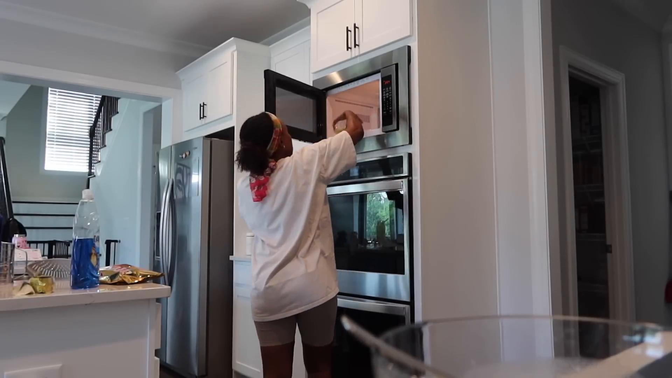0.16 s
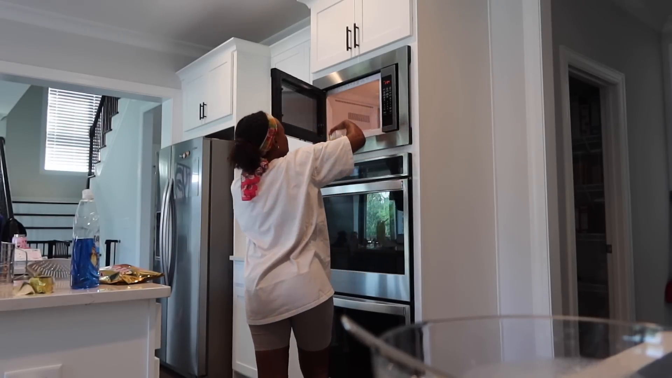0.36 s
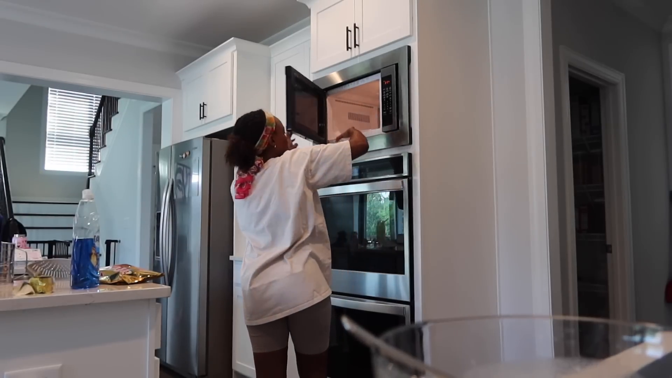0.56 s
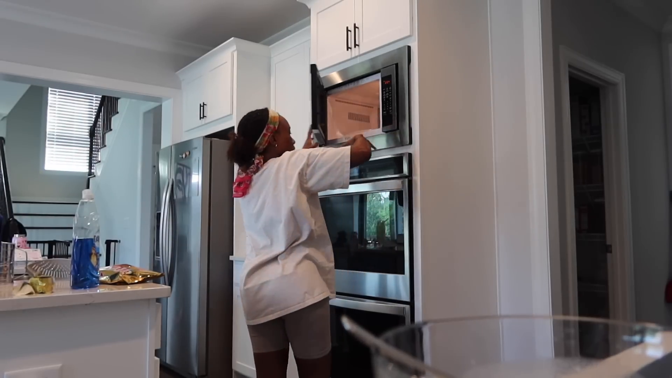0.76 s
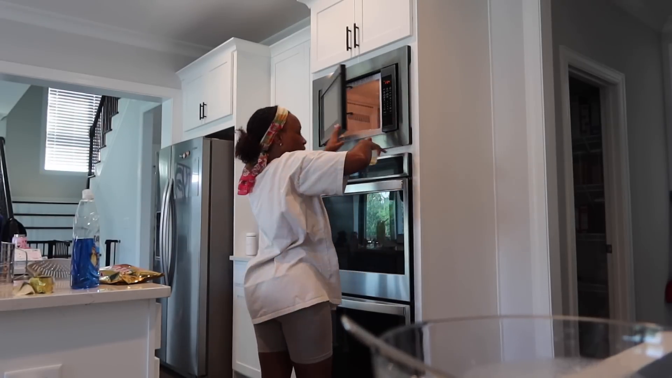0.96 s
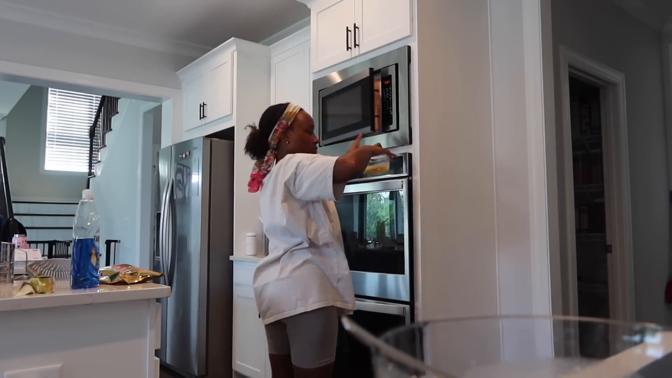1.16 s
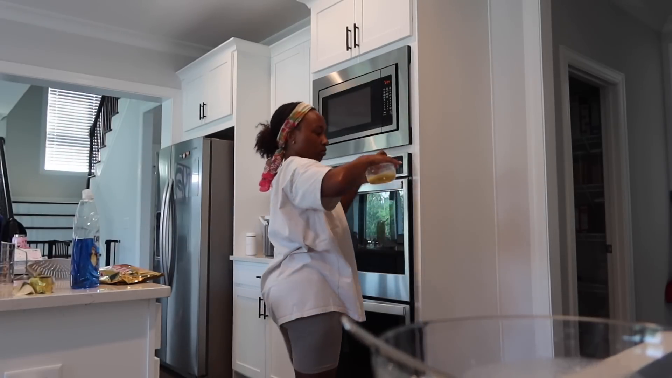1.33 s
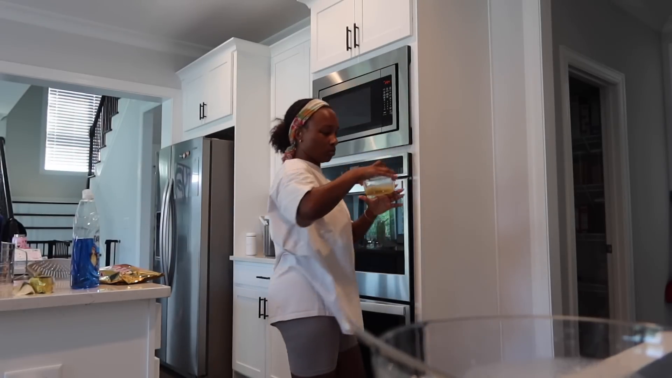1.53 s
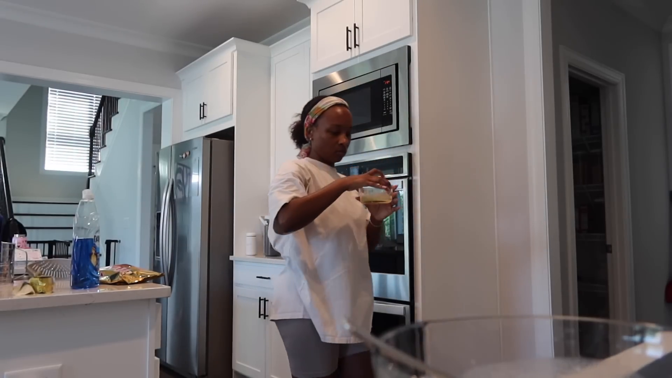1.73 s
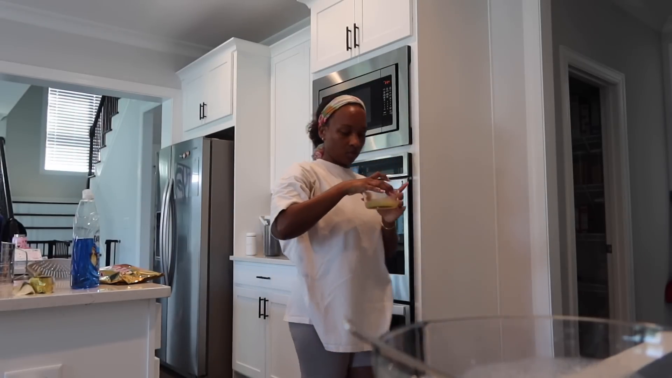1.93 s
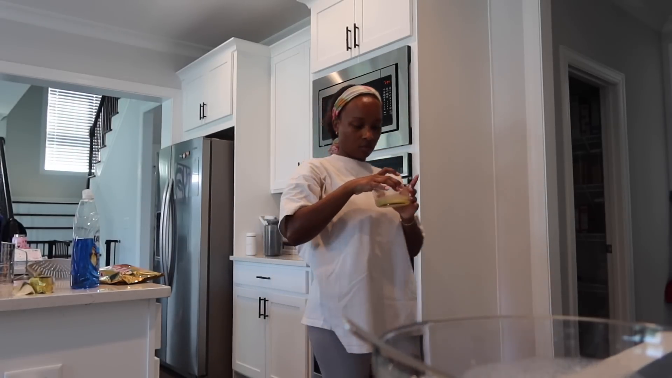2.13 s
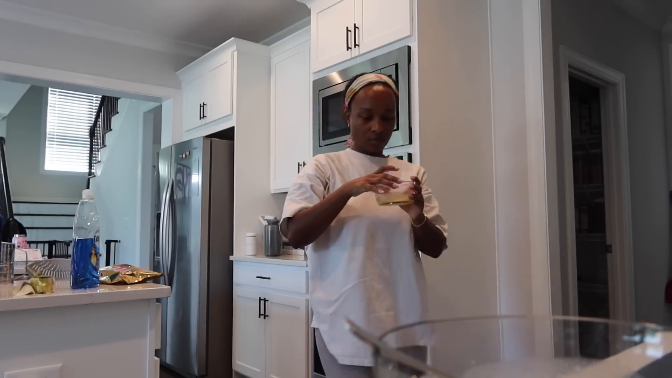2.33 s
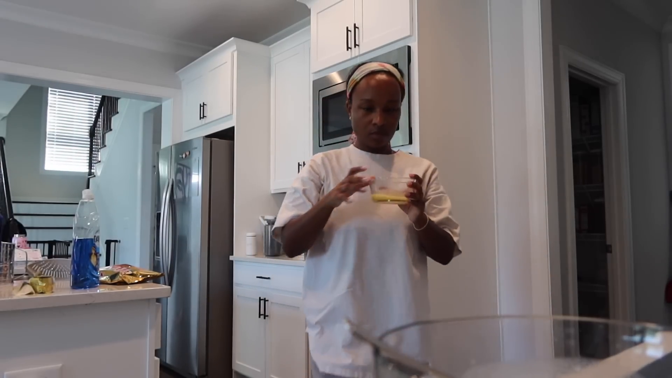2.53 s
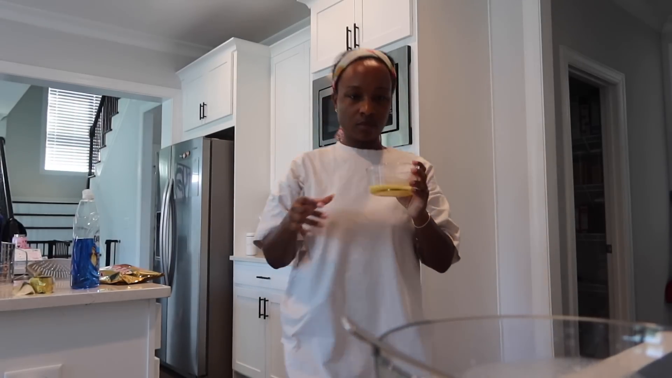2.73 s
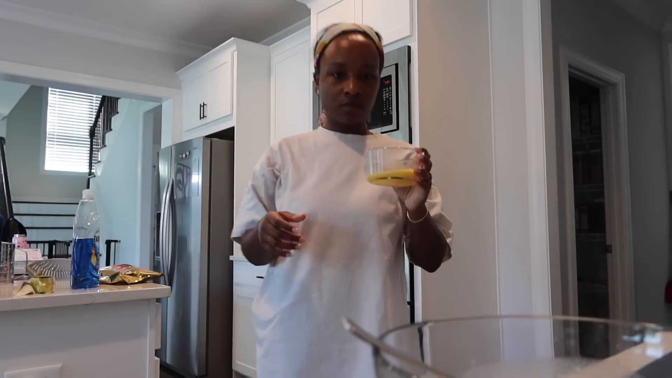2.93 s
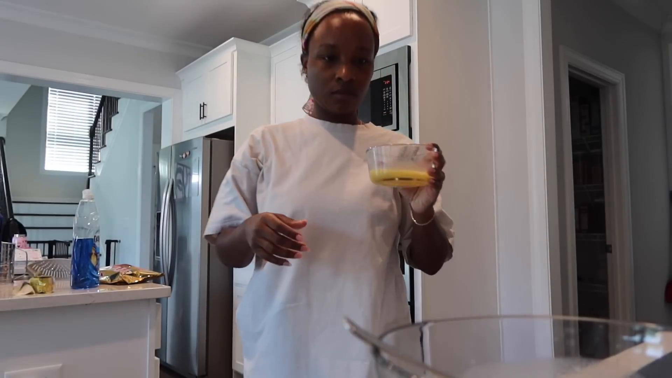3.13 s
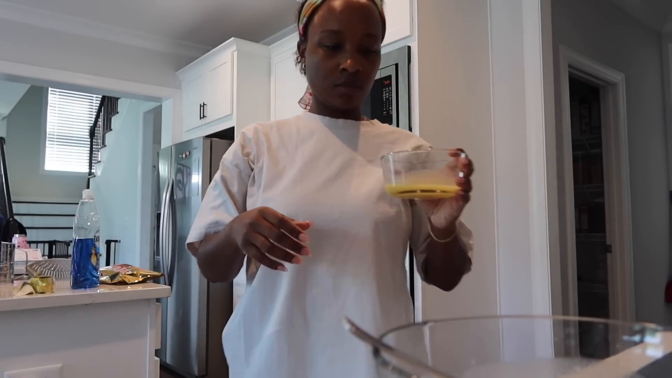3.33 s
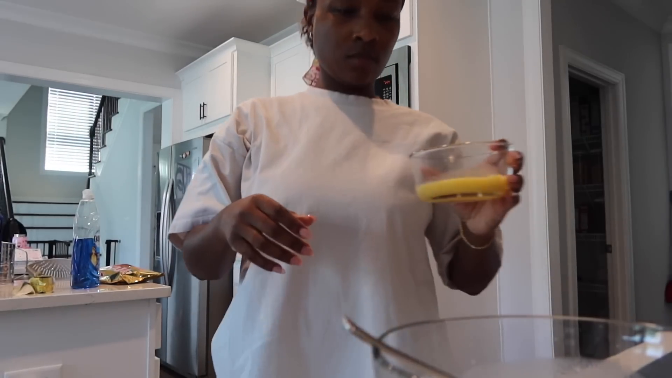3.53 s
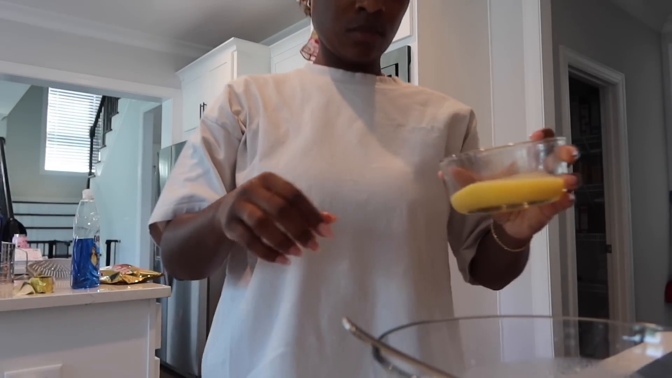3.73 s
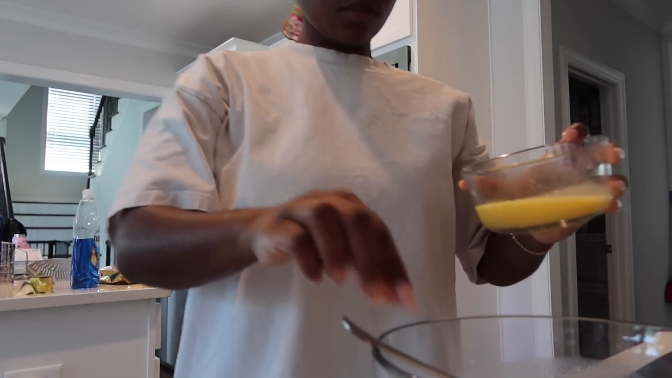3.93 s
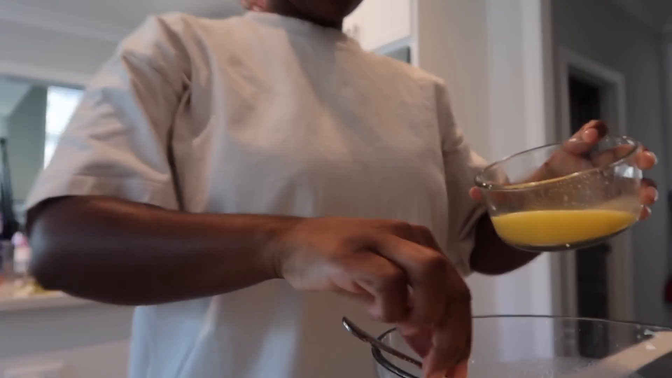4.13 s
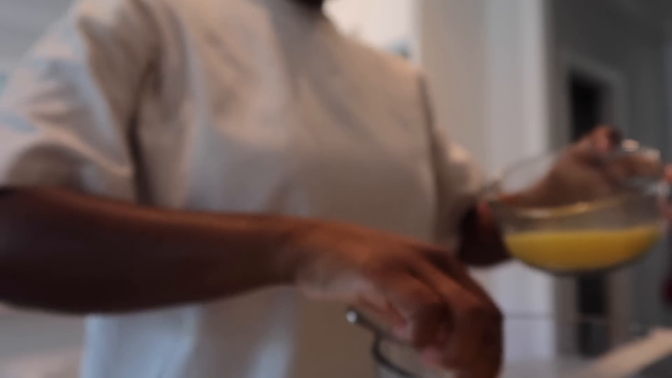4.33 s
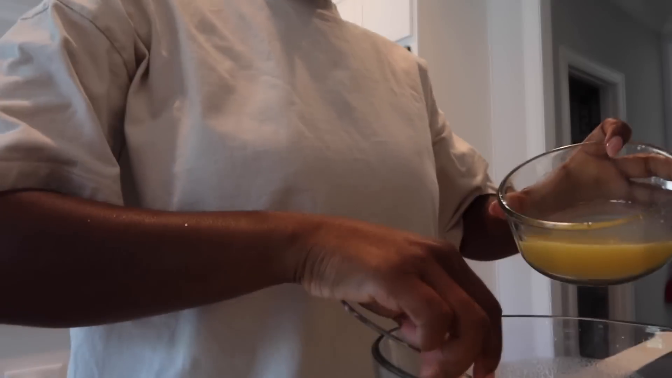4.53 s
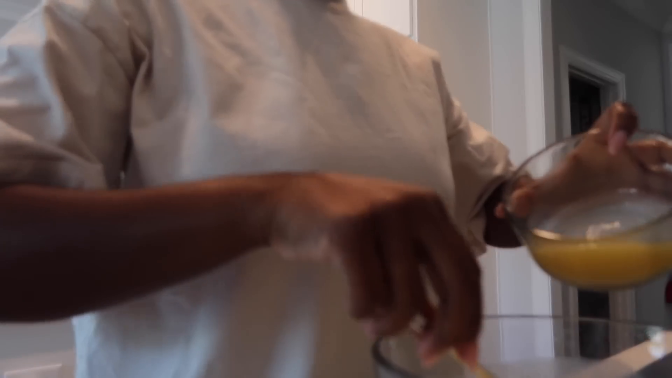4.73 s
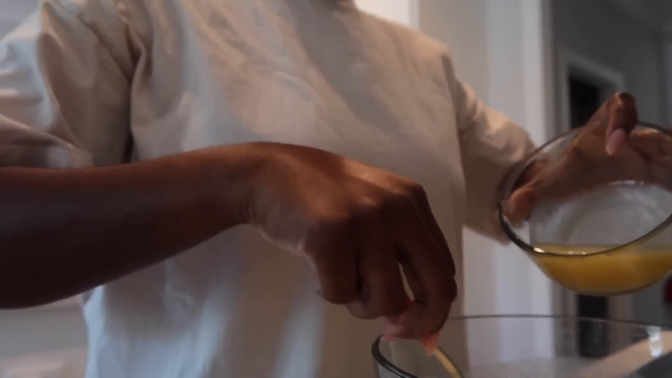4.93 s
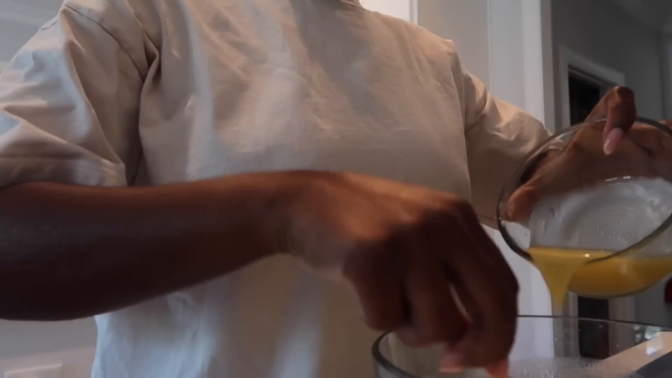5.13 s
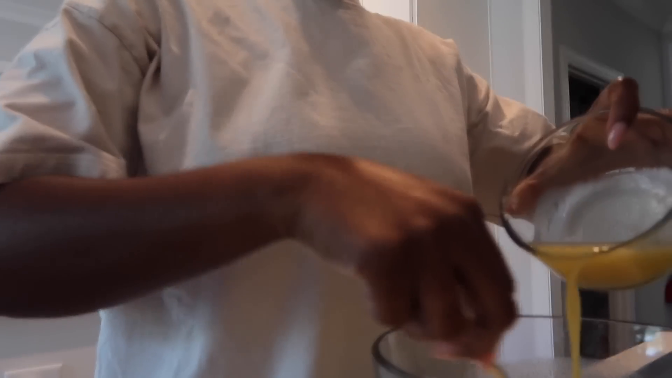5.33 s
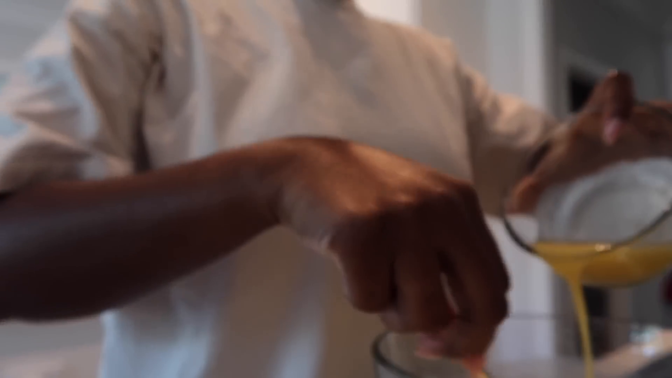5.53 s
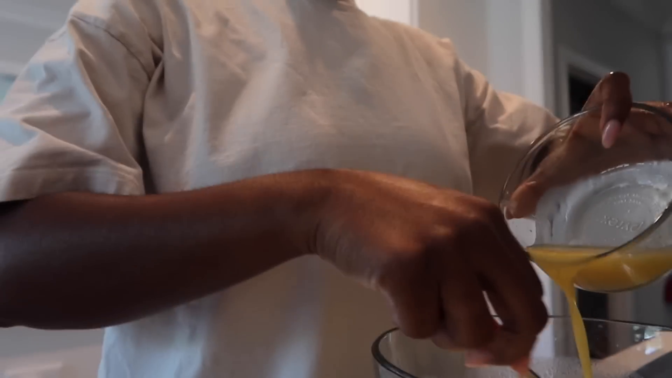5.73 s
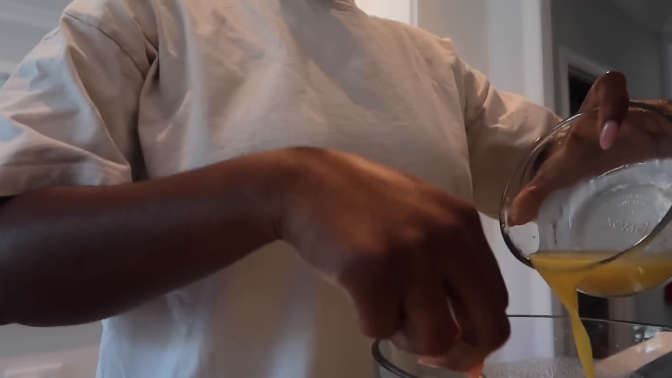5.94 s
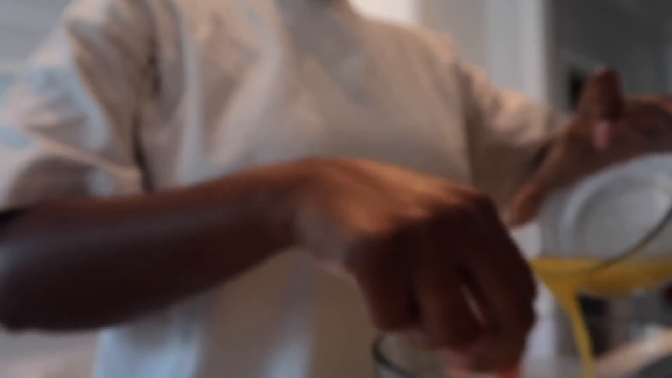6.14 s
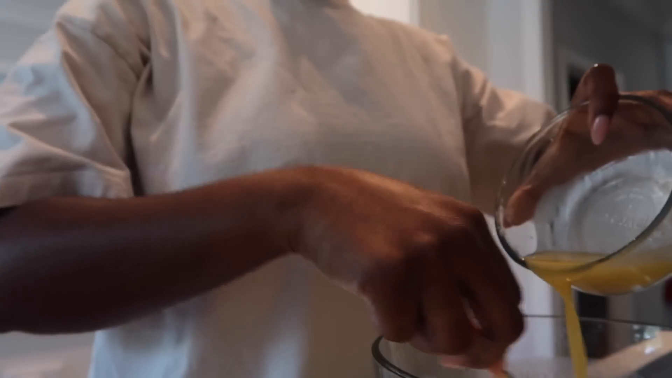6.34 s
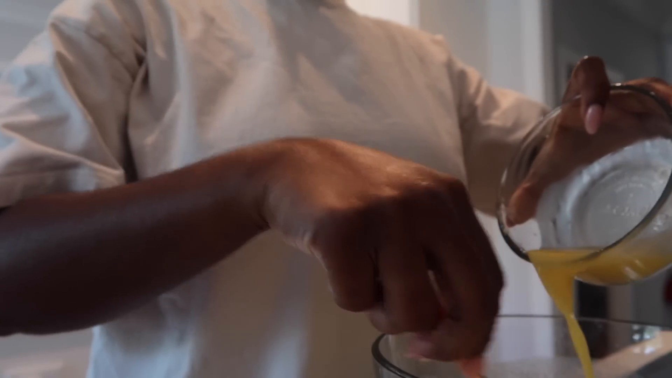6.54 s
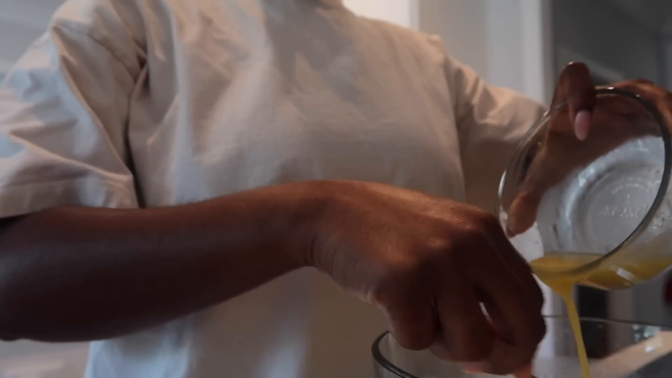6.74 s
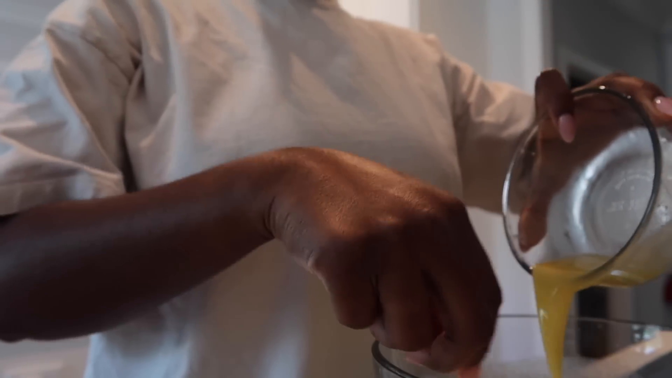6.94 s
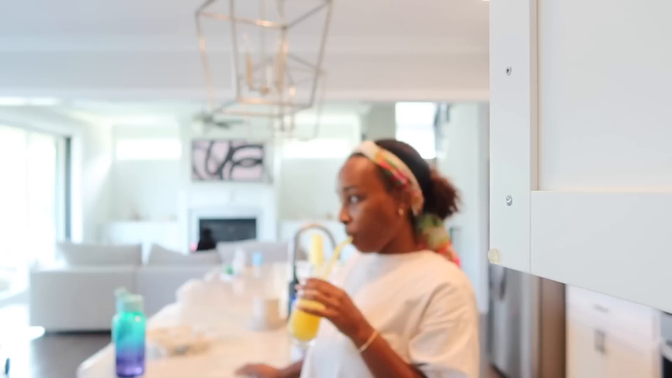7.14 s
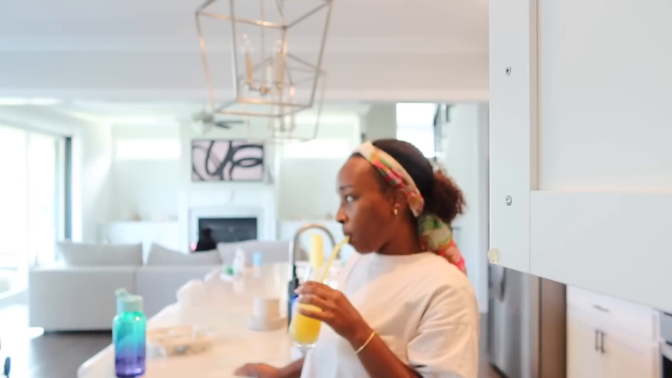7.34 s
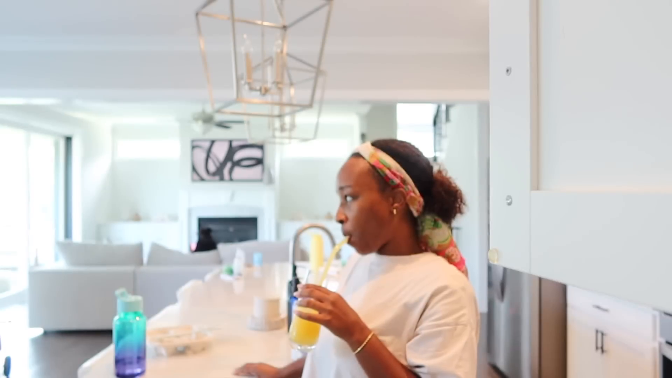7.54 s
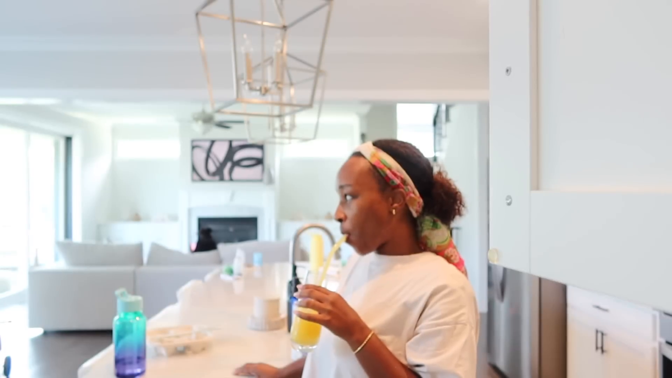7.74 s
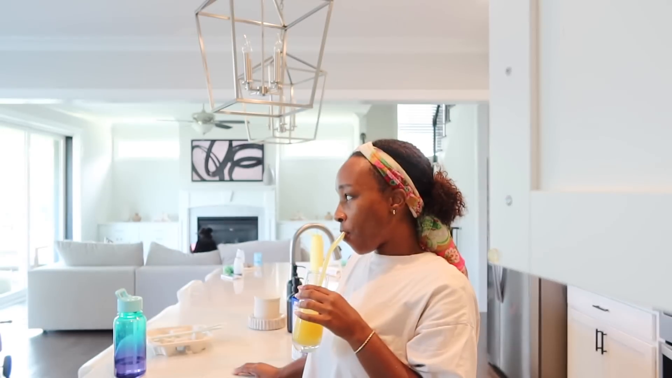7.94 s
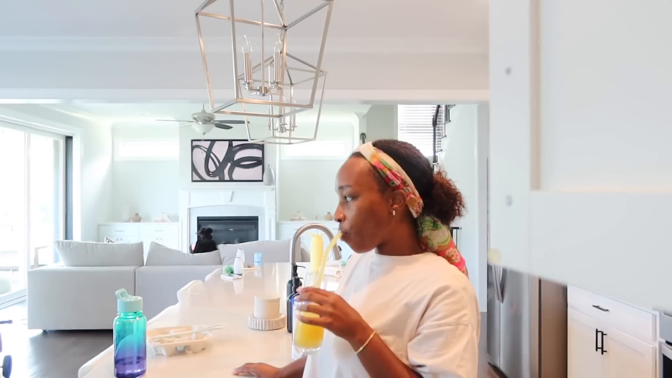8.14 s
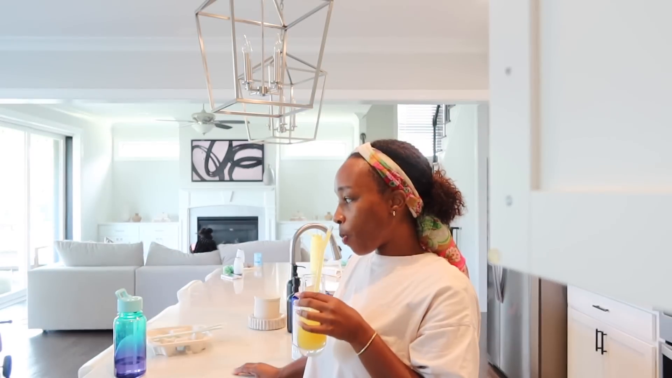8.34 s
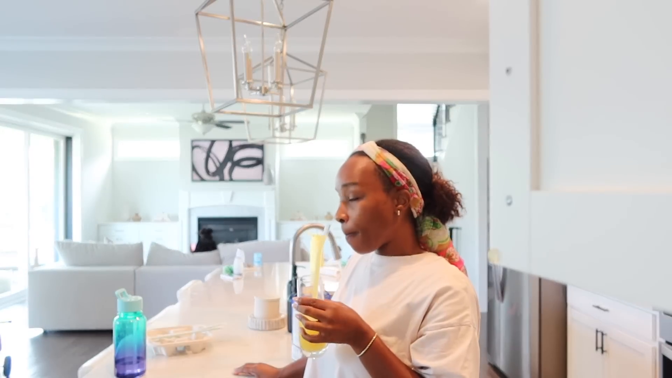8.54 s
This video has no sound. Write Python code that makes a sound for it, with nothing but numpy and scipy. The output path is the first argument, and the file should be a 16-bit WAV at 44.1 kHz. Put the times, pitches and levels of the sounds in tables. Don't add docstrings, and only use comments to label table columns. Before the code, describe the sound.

A quiet, fairly reverberant home kitchen with soft low appliance hum, the microphone on the worktop. Faint cloth brushes at 0.0 and 0.4 s. At 1.3 s a latch cracks, and at 1.36 s a door slams extremely loudly, near clipping, with a hollow boom and under a second of room echo. Cloth sweeps around 2.0-2.4 s; a dry floor snap and soft thud at 2.55 s, light steps at 2.7 and 3.4, another snap at 3.9. From 4.2 to 4.6 s a spoon chatters and knocks on a glass bowl, close and slightly right, with a brief glassy ring. Until 7.1 s come irregular stirring ticks, faint rubs and grit, stronger at 5.15, 5.34 (small clunk), 5.85, 6.44 and 6.94. At 7.17 s an abrupt cut: steady bright water hiss, sputtering gushes near 7.55 and 8.5, metallic droplet pings, lasting to 8.7 s.

```python
import sys
import numpy as np
from scipy import signal
from scipy.fft import rfft, irfft, next_fast_len
from scipy.io import wavfile
from scipy.ndimage import uniform_filter1d

SR = 44100
rng = np.random.default_rng(int(sys.argv[2]) if len(sys.argv) > 2 else 0)


def file_out(sig):
    cols = np.atleast_2d(sig).T
    lim = np.clip(cols, -1, 1)
    pcm = np.round(lim * 32767).astype(np.int16)
    wavfile.write(sys.argv[1], SR, pcm)


def gain_from_db(level_db):
    decades = np.asarray(level_db, float) / 20
    return 10 ** decades


N = 382788

# time_s, level_db
AIR_LEVEL = [
    (0, -48.5),
    (2.2, -47),
    (3, -47.5),
    (7.1, -48.5),
    (8.68, -50.5),
]
# freq_hz, density_db
AIR_SPECTRUM = [(12, -63), (20, -13.5), (157, -0.5), (191, 0.5), (299, -5.5), (373, -6.5), (521, -13),
                (583, -12.5), (814, -14), (962, -12), (1110, -18), (1200, -16), (1780, -17.5), (5270, -25),
                (15600, -44.5)]
# freq_hz, side_minus_mid_db
AIR_SIDE = [(60, -14), (110, -10), (200, -7.5), (380, 1), (700, -1.5), (1290, -0.5), (2380, -5.5),
            (4400, -3.5), (8120, -4), (15000, -1)]
# freq_hz, width_hz, gain_db
ROOM_MODES = [(97.5, 36, 6.5), (174, 23, 3), (376.6, 33, 7.5), (473, 53, 6.5)]

# start_s, level_db, centre_hz, contact_ms
RUSTLES = [
    (.01, -42.5, 1280, 63),
    (.385, -43, 4230, 16),
    (1.95, -49.5, 2580, 120),
    (2.07, -49, 2610, 120),
    (2.19, -46, 3030, 130),
    (2.3, -49, 2600, 110),
    (3.241, -41.5, 1280, 10),
    (3.55, -40.5, 1800, 35),
]
# start_s, level_db, centre_hz, contact_ms
CRACKS = [
    (1.306, -15.5, 2160, 42),
    (2.547, -21.5, 1760, 10.5),
    (3.903, -24, 1740, 15),
    (4.005, -37.5, 890, 11),
]
# start_s, level_db, centre_hz, contact_ms
THUMPS = [(1.385, -14.5, 522, 206), (1.35, -13, 97, 75), (2.545, -26.5, 455, 5.8), (2.62, -38.5, 188, 100),
          (3.906, -33, 509, 22), (4.007, -33.5, 255, 25.5), (4.525, -31.5, 530, 95), (4.805, -41, 430, 20),
          (5.145, -37, 326, 15), (5.342, -40, 160, 17), (5.02, -44, 420, 51)]
# start_s, level_db, centre_hz, contact_ms
CLANKS = [
    (1.306, -15, 1220, 21),
    (4.4, -38.5, 1050, 52),
]
# start_s, level_db, centre_hz, contact_ms
KNOCKS = [
    (2.5434, -20.5, 1450, 1.6),
    (4.212, -33, 1700, 12),
    (4.518, -27, 1500, 30),
    (4.398, -39, 1900, 20),
    (5.341, -34, 1400, 12),
    (7.093, -32, 2110, 5.9),
]

# freq_hz, t60_s
ROOM_T60 = [(60, 0.89), (500, 0.81), (2000, 0.72), (5000, 0.64), (9000, 0.4), (14000, 0.074)]
# freq_hz, side_minus_mid_db
ROOM_SIDE = [(50, -51), (120, -33), (500, -19), (3000, -14.5), (10000, 6.5)]

# start_s, level_db, panel_db, rise_share, brightness_db_per_octave
DOOR_BLOWS = [
    (1.302, -13, -9, 0.15, 6),
    (1.351, -13.5, -29, 0.69, 5),
    (1.364, 3.5, -23, 0.19, 5),
    (1.3702, -18, -4, 0.1, -7.5),
    (1.379, -12.5, 9, 0.26, 0.5),
    (1.392, -20, 9.5, 0.31, -5.5),
    (1.404, -11.5, 1.5, 0.95, -7.5),
]
# freq_hz, density_db
DOOR_CRACK = [(88, -70.5), (150, -0.5), (308, 0.5), (595, 4), (912, -5.5), (1240, -3.5), (3040, -10),
              (5030, -17.5), (5650, -24), (8170, -26.5), (15500, -40)]
# freq_hz, level_db, t60_s
DOOR_PANEL = [(44.3, -12, 0.69), (72, -2, 0.2), (52, -10, 0.4), (89, -4, 0.19), (98.4, 9.5, 0.25),
              (124, -1, 0.17), (150.3, -11, 0.31), (170, -4.5, 0.41), (202, 1, 0.24), (237, -7.5, 0.55),
              (276, -12, 0.51), (303, -11, 0.26), (380.4, 3, 0.49), (450, 1.5, 0.28), (512, 0.5, 0.47),
              (678, -3.5, 0.26), (708, -6, 0.33), (626.6, 10, 0.27), (750, -28, .12), (1220, -17, .06)]
# freq_hz, level_db, t60_s
GRILLE = [(5000, -55, 2.9)]
# freq_hz, side_minus_mid_db
DOOR_SIDE = [(60, -50), (200, -33), (500, -12), (900, -17), (3000, -30)]

# start_s, level_db, floor_hz, t60_s
FOOTFALLS = [
    (1.37, -21.5, 74.9, 0.99),
    (1.327, -25.5, 170, 0.32),
    (2.021, -34, 42, 0.31),
    (2.557, -36.5, 115.4, 0.2),
    (2.716, -37, 48.3, 0.24),
    (3.37, -36, 54.6, 0.35),
    (3.91, -32, 139, 0.12),
    (4.01, -31, 143, 0.047),
    (4.536, -27, 157, 0.096),
]

# start_s, level_db, contact_ms, bowl_db, brightness_db_per_octave
SCRAPES = [(4.209, -25, 15.3, 0.5, -3), (4.24, -40, 11, 15, -5), (4.318, -37, 39, 2, -6),
           (4.346, -43, 23, -17, -37), (4.385, -35, 53, 24, -14), (4.436, -41, 26, 17, -5),
           (4.49, -37, 44, -5, -5), (4.511, -25, 25, 7, 2), (4.533, -29.5, 11.5, 4, -1),
           (4.565, -40, 22, -6, -1.5), (4.905, -52, 40, 6, -4)]
# freq_hz, level_db, t60_s
SPOON = [(2450, 0.5, 0.11), (3490, 3, 0.095), (4770, -10, 0.067), (6220, -15, 0.15), (7650, -13, 0.083),
         (9360, -20, 0.1), (11200, -20, 0.08), (13200, -28, .1)]
# freq_hz, level_db, t60_s
BOWL = [(1050, -11, 0.12), (1400, -9.5, 0.23), (1700, -1.5, 0.063), (1926, -6, 0.1), (2080, 1, 0.035),
        (2360, -6, 0.2), (3150, -4, 0.058), (3420, -11, 0.15), (3520, -12, 0.3), (4230, -28, 0.14),
        (5600, -27, 0.15)]
LET_GO_S = (4.52, 4.6)
GRIP_RING, LOOSE_RING = .4, .55

# start_s, level_db, pitch_hz
RUBS = [(4.215, -47, 4800), (4.245, -50, 1670), (4.495, -41, 1660), (4.905, -47.5, 1675), (5.16, -55, 3380),
        (5.87, -53, 3400), (6.235, -49.5, 1940), (6.445, -49, 2520), (6.586, -49, 2040), (6.775, -58, 1990),
        (6.829, -49, 2000), (6.664, -58, 4060), (6.96, -54, 3480), (7.0, -58, 3470), (7.03, -57, 3480),
        (5.035, -57, 1550), (4.95, -56, 1560), (5.269, -58, 1810), (6.97, -50, 1900)]
RUB_MS = 57

# start_s, level_db, contact_ms
RESTS = [
    (4.7318, -35.5, 37),
    (4.748, -42, 25),
    (4.802, -38.5, 33),
]
# freq_hz, level_db, t60_s
HELD_BOWL = [(1310, -2, .04), (1800, -6, .035), (2290, -2, .04), (2420, -5, .04), (3230, 0, .035),
             (4000, -2, .03), (4700, -14, .03)]
# freq_hz, level_db, t60_s
FREE_BOWL = [(1195, -10, .3), (1400, -3, .51), (1615, -20, .3), (2342, 1, 0.4), (3150, -6, 0.24),
             (3370, -12, .28), (3461, -6, 0.35), (3542, -21, 0.35), (6164, -6, .21)]
FREE_S, FREE_DB = 4.54, -35
# freq_hz, level_db, t60_s
BOWL_BASE = [(455, -18, 0.078), (729, 4, 0.2), (810, -5, 0.084), (1150, -12, 0.086), (1448, -16, .06),
             (1561, -15, 0.1), (1744, -14, .09)]
CLUNK_S, CLUNK_DB = 5.341, -34.5

# start_s, level_db, pitch_hz, click_db
TAPS = [
    (4.7312, -39, 3260, -42),
    (4.804, -44, 2300, -48),
    (5.1467, -27.5, 2140, -36.5),
    (5.341, -34, 1600, -23.5),
    (5.604, -38.5, 1990, -50),
    (5.8529, -27, 2190, -33.5),
    (6.2876, -32.5, 2160, -39.5),
    (6.4394, -25.5, 2474, -50),
    (6.934, -33, 2140, -39.5),
    (6.944, -30.5, 2200, -45),
]
# start_s, level_db, pitch_hz
TOUCHES = [(5.2669, -45.5, 1805), (5.315, -45, 1760), (5.925, -44, 2000), (6.058, -41.5, 2600),
           (6.149, -46, 1910), (6.2286, -40.5, 2070), (6.395, -42, 2790), (6.489, -45, 2450),
           (6.561, -43, 2030), (6.6149, -42, 2030), (6.6338, -47, 1930), (6.6657, -50, 1780),
           (6.8418, -50, 2080), (6.9556, -35, 2050), (7.02, -41, 1280), (7.0475, -46.5, 1960),
           (7.0905, -41.5, 3060), (7.1252, -45, 3920)]
# ratio_to_pitch, level_db, ratio_to_t60
TIP = [(.93, 3.5, 0.52), (1.58, -2, .6), (1.2, 2, 0.46), (2.7, -7, 0.27), (0.4, -17, 4.5), (1.2, -14, 4.6),
       (1.3, 8.5, 0.18), (1.8, -13, 0.9), (1, 9.5, 0.73), (0.61, -11, 0.77), (3.7, -13, 0.29)]
# freq_hz, level_db
CLICK = [(3500, -9), (5000, -21), (8000, -11), (11500, -1), (14500, -9), (16000, -35)]
TAP_MS, TOUCH_MS = 1.2, 16
TAP_RISE, TOUCH_RISE = .1, .35
TOUCH_CLICK_DB, TIP_T60_S = -21, 0.064

# freq_hz, level_db, t60_s
STIR = [(1780, -11, 0.061), (1960, -8.5, 0.041), (2140, -2, .05), (2450, -18, 0.034), (3380, -4, .03)]
STIR_FROM_S, STIR_TO_S, STIR_PER_S = 4.85, 7.15, 45

# time_s, level_db
FLOW = [
    (7.171, -38),
    (7.185, -37.5),
    (8.13, -37.5),
    (8.184, -40.5),
    (8.21, -38),
    (8.68, -37),
]
# freq_hz, density_db
WATER = [(240, -55), (400, -20), (488, -4), (684, -14.5), (785, -9.5), (902, -20), (1190, -10), (1750, -9),
         (2370, -8.5), (3120, -5.5), (4310, -8), (4650, -10.5), (5770, -8.5), (9270, -21), (13800, -19.5),
         (15600, -31)]
# freq_hz, width_hz, gain_db
SINK = [(1960, 26, 8), (2250, 35, 1), (2790, 60, -3), (3090, 120, -1), (3380, 27, -35), (4310, 220, 2),
        (5700, 110, 1)]
# freq_hz, side_minus_mid_db
WATER_SIDE = [(60, -18), (110, -3), (200, 10), (380, -19), (700, -8.5), (1290, -50), (2380, -33),
              (4400, -16.5), (8120, -1.5), (15000, -8.5)]
# freq_hz, level_db
DRAIN = [(50, -28), (95, -12), (125, 4.5), (190, -15), (300, -31)]
# start_s, level_db, pitch_hz
SPITS = [(7.1798, -25, 4400), (7.225, -17.5, 5700), (7.3589, -23, 2970), (7.412, -21.5, 2750),
         (7.4467, -27, 2940), (7.5405, -16, 4230), (7.6062, -17, 3080), (7.657, -21, 3180),
         (7.74, -24, 2210), (7.375, -24, 2070), (8.087, -26, 1400), (7.835, -26, 5750), (7.859, -23, 4340),
         (8.01, -33, 4370), (8.21, -29, 2970), (8.2586, -20.5, 2850), (8.2864, -19, 4260),
         (8.342, -16.5, 4320), (8.421, -19, 5700), (8.5287, -20, 2970), (8.5755, -19, 3180)]
# crest_s, swell_db
GUSHES = [(7.184, 3.5), (7.482, 0), (7.544, 8), (7.607, 9), (7.66, 2), (7.72, 2), (8.21, 5.5), (8.27, 4),
          (8.3, 4), (8.34, -1), (8.529, 8.5), (8.58, 4.5)]
GUSH_RISE_S, GUSH_FALL_S, BASIN_FALL_S = .004, .008, .14
BASIN_DB, BASIN_LINGER, FLOW_SHARE = -1, 0.33, 0.18
DRIFT_DB, PATTER_DB = .4, 3.2

CRACKLE_HZ = (1750, 2200, 2850, 3150, 3600, 4300, 5700)
CRACKLE_PER_S, CRACKLE_DB = 90, -37.5

# freq_hz, level_db
TOP = [(15600, 0), (16200, -25)]


def over_hz(table, hz):
    f, v = np.transpose(table)
    return np.interp(np.log(hz + 1), np.log(f), v)


def over_s(table):
    s, v = np.transpose(table)
    return np.interp(np.arange(N) / SR, s, v)


def colour(x, *tables, peaks=()):
    size = next_fast_len(len(x))
    hz = np.arange(size // 2 + 1) * SR / size
    db = sum(over_hz(t, hz) for t in tables)
    db = db + sum(gain / (1 + (2 * (hz - f) / width) ** 2) for f, width, gain in peaks)
    return irfft(rfft(x, size) * gain_from_db(db), size)[:len(x)]


def rms1(x):
    return x / np.sqrt(np.mean(x ** 2))


def peak1(x):
    return x / np.abs(x).max()


def add(out, s, x):
    i = int(s * SR)
    out[..., i:i + x.shape[-1]] += x[..., :N - i]


def contact(ms, rise=0.026):
    t = np.arange(4096) / (max(ms, .2) * SR / 1000)
    swell = np.minimum(t / max(rise, .01), 1) ** 2
    return rng.standard_normal(4096) * np.exp(-3 * t) * swell


def ring(modes, seconds, scatter_db=0., tilt_db=0.):
    hz, db, t60 = np.transpose(modes)[:, :, None]
    t = np.arange(int(seconds * SR)) / SR
    db = db + scatter_db * rng.standard_normal(hz.shape) + tilt_db * np.log2(hz / 3000)
    return np.sum(gain_from_db(db - 60 * t / t60) * np.sin(2 * np.pi * hz * t), axis=0)


def walk(rate):
    k = int(SR / rate)
    held = np.repeat(rng.standard_normal(N // k + 1), k)
    return 0.59 * uniform_filter1d(uniform_filter1d(held, k), k)[:N]


def wide(mid, side):
    return np.array([mid + side, mid - side])


def even(shape, burst):
    return shape * np.sqrt(np.sum(burst ** 2) / np.sum(shape ** 2))


def air():
    mid, side = rng.standard_normal((2, N))
    tone = wide(colour(mid, AIR_SPECTRUM, peaks=ROOM_MODES), colour(side, AIR_SPECTRUM, AIR_SIDE))
    return rms1(tone) * gain_from_db(over_s(AIR_LEVEL) + 1.5 + 0.115 * walk(4.9))


def rustles_and_snaps():
    near, far = np.zeros(N), np.zeros(N)
    # kind, width as share of centre, room dB
    kinds = [(RUSTLES, 1.05, 4.2), (CRACKS, 1, 2.7), (THUMPS, 0.78, -4), (CLANKS, 0.44, 0.77), (KNOCKS, 0.99, -5.5)]
    for rows, share, room_db in kinds:
        for s, db, hz, ms in rows:
            width = share * hz
            top = width / 2 + np.hypot(width / 2, hz)
            sos = signal.butter(4, [top - width, top], "band", fs=SR, output="sos")
            burst = gain_from_db(db) * peak1(signal.sosfilt(sos, contact(ms)))
            pulse = even(signal.sosfilt(sos, signal.unit_impulse(4096)), burst)
            add(near, s, burst)
            add(far, s, (burst if ms > 25 else pulse) * gain_from_db(room_db))
    return near, far


def room(x):
    t, tail = np.arange(SR) / SR, 0
    for hz in 45 * 2 ** np.arange(0, 8.5, .5):
        sos = signal.butter(2, [hz / 2 ** .25, hz * 2 ** .25], "band", fs=SR, output="sos")
        decay = gain_from_db(-60 * t / over_hz(ROOM_T60, hz))
        mid, side = signal.sosfilt(sos, rng.standard_normal((2, SR))) * decay
        tail = tail + wide(mid, side * gain_from_db(over_hz(ROOM_SIDE, hz)))
    grain = rng.standard_normal(SR // 100).repeat(100) * np.exp(-t / .1)
    tail = tail * gain_from_db(1.5 * grain) * (1 - np.exp(-(t / 0.0019) ** 2))
    tail = tail / np.sqrt(np.sum(tail ** 2) / 2)
    return signal.fftconvolve(x[None], tail, axes=1)[:, :N]


def door():
    near, far = np.zeros(N), np.zeros(N)
    for s, db, panel_db, rise, tilt_db in DOOR_BLOWS:
        tilt = [(125, -3 * tilt_db), (2000, tilt_db)]
        crack = gain_from_db(db) * peak1(colour(contact(21.3, rise), DOOR_CRACK, tilt))
        pulse = colour(signal.unit_impulse(4096, 256), DOOR_CRACK, tilt)
        boom = signal.fftconvolve(np.hanning(30), ring(DOOR_PANEL, 1., 2.))
        boom = gain_from_db(db + panel_db) * peak1(boom)
        add(near, s, crack)
        add(far, s, even(pulse, crack))
        add(near, s, boom)
        add(far, s, boom * gain_from_db(-10.0))
    add(near, DOOR_BLOWS[2][0], ring(GRILLE, .67))
    return near, far


def footfalls():
    out = np.zeros(N)
    for s, db, hz, t60 in FOOTFALLS:
        heel = np.hanning(int(.6 * SR / hz))
        floor = ring([(hz, 0, t60), (1.5 * hz, -4, t60)], .6)
        add(out, s, gain_from_db(db) * peak1(signal.fftconvolve(floor, heel)))
    return out


def chatter():
    out = np.zeros(N)
    for s, db, ms, bowl_db, tilt_db in SCRAPES:
        damp = [1, 1, LOOSE_RING if LET_GO_S[0] < s < LET_GO_S[1] else GRIP_RING]
        spoon = ring(np.multiply(SPOON, damp), .4, 1.4, tilt_db)
        body = spoon + gain_from_db(bowl_db) * ring(np.multiply(BOWL, damp), .4, 1.5)
        body = body * np.minimum(np.arange(len(body)) / (.0012 * SR), 1)
        slips = contact(ms, .35) * gain_from_db(1.8 * rng.exponential(size=4096))
        add(out, s, gain_from_db(db) * peak1(signal.fftconvolve(slips, body)))
    return out


def rubs():
    out = np.zeros(N)
    for s, db, hz in RUBS:
        sos = signal.butter(2, [hz - 60, hz + 60], "band", fs=SR, output="sos")
        add(out, s, gain_from_db(db) * peak1(signal.sosfilt(sos, contact(RUB_MS, 0.12))))
    return out


def bowl_rings():
    out = np.zeros(N)
    free = signal.fftconvolve(np.hanning(9), ring(FREE_BOWL, .5))
    add(out, FREE_S, gain_from_db(FREE_DB) * peak1(free))
    for s, db, ms in RESTS:
        held = signal.fftconvolve(contact(ms, 0.037), ring(HELD_BOWL, .2, 0.89))
        add(out, s, gain_from_db(db) * peak1(held))
    clunk = signal.fftconvolve(np.hanning(14), ring(BOWL_BASE, .3))
    add(out, CLUNK_S, gain_from_db(CLUNK_DB) * peak1(clunk))
    return out


def ticks():
    out = np.zeros(N)
    strikes = [(*row, TAP_MS, TAP_RISE) for row in TAPS]
    strikes += [(s, db, hz, db + TOUCH_CLICK_DB, TOUCH_MS, TOUCH_RISE) for s, db, hz in TOUCHES]
    for s, db, hz, click_db, ms, rise in strikes:
        modes = ring(np.multiply(TIP, [hz, 1, TIP_T60_S]), .2, 2.2)
        body = gain_from_db(db) * peak1(signal.fftconvolve(contact(ms, rise), modes))
        click = colour(np.roll(contact(7.7), 64), CLICK)
        add(out, s, body)
        add(out, s + 0.0055, gain_from_db(-11.5) * body)
        add(out, s, gain_from_db(click_db) * peak1(click))
    return out


def stir():
    out = np.zeros(N)
    span = STIR_TO_S - STIR_FROM_S
    for when, size in rng.random((int(STIR_PER_S * span), 2)):
        add(out, STIR_FROM_S + when * span, gain_from_db(-60.5 + 2.8 * size) * ring(STIR, .08, 1.0))
    return out


def gushes():
    crest_s, swell_db = np.transpose(GUSHES)[:, :, None]
    since = np.arange(N) / SR - crest_s
    db = swell_db * np.clip(1 + since / GUSH_RISE_S, 0, 1)
    after = np.maximum(since, 0)
    crest_db = np.sum(db * np.exp(-after / GUSH_FALL_S), axis=0)
    linger_db = np.sum(db * np.exp(-after / BASIN_FALL_S), axis=0)
    return crest_db, linger_db


def spray(crest_db, linger_db):
    sizes = rng.exponential(size=(2, N // 64 + 1)).repeat(64, axis=1)
    drops = rng.standard_normal((2, N)) * gain_from_db(1.46 * uniform_filter1d(sizes, 48)[:, :N])
    spectrum = rfft(drops)
    patter_db = PATTER_DB * np.clip(walk(70), -1, 1)
    swell_db = BASIN_DB + (1 - FLOW_SHARE) * crest_db + patter_db
    hiss = 0
    for hz in 350 * 2 ** np.arange(0, 6, .5):
        band = [(hz / np.sqrt(2), 0), (hz, 1), (hz * np.sqrt(2), 0)]
        share = over_hz(band, np.fft.rfftfreq(N, 1 / SR))
        level_db = 2.2 * walk(25) + DRIFT_DB * walk(2.1)
        level_db = level_db + swell_db * (2300 < hz < 6000)
        level_db = level_db + BASIN_LINGER * linger_db * (2300 < hz < 4500)
        hiss = hiss + irfft(spectrum * share, N) * gain_from_db(level_db)
    mid, side = hiss
    side = 1.9 * side + 0.28 * np.roll(mid, -3)
    humps = [(hz, width, 5.5 + 0.27 * db) for hz, width, db in SINK]
    return rms1(wide(colour(mid, WATER, peaks=humps), colour(side, WATER, WATER_SIDE, peaks=humps)))


def water():
    crest_db, linger_db = gushes()
    on = np.clip((np.arange(N) / SR - FLOW[0][0]) / 0.0024, 0, 1)
    out = spray(crest_db, linger_db) * on * gain_from_db(over_s(FLOW) + FLOW_SHARE * crest_db - 1.5)
    out += on * gain_from_db(-50.5) * rms1(colour(rng.standard_normal(N), DRAIN))
    for s, db, hz in SPITS:
        modes = [(hz, 0, .025), (0.99 * hz, -9, .015), (.72 * hz, -5, .02), (1.8 * hz, -8, .015)]
        spit = signal.fftconvolve(contact(6.6, 0.062), ring(modes, .1, 2.5))
        add(out, s, gain_from_db(db - 9.0) * peak1(spit)[None])
    return out


def crackle():
    out, start_s = np.zeros(N), FLOW[0][0]
    length = N / SR - start_s
    fade = np.hanning(int(.03 * SR)) ** 0.16
    for when, note, off, size in rng.random((int(CRACKLE_PER_S * length), 4)):
        hz = CRACKLE_HZ[int(note * len(CRACKLE_HZ))] * (.97 + .06 * off)
        ping = ring([(hz, 0, .02)], .03) * fade
        add(out, start_s + when * length, gain_from_db(CRACKLE_DB - 8 * size) * ping)
    return out


def scene():
    near, far = rustles_and_snaps()
    slam, slam_far = door()
    feet, rim = footfalls(), chatter()
    tips = rubs() + ticks() + stir()
    close = rim + tips + bowl_rings()
    bowl = np.array([gain_from_db(2.0) * np.roll(close, 1), gain_from_db(5) * close])
    sent = gain_from_db(-3.0) * slam_far + far + gain_from_db(-2.0) * feet + gain_from_db(-7.0) * rim + gain_from_db(-11) * tips
    slam = wide(slam, colour(slam, DOOR_SIDE))
    return air() + slam + near + feet + bowl + room(sent) + water() + crackle()


def band_limit(x):
    return signal.sosfilt(signal.butter(12, 15770, fs=SR, output="sos"), x)


def record(dry):
    clipped = np.clip(dry, -.93, .93)
    mix = np.array([colour(x, TOP) for x in clipped])
    return band_limit(mix)


dry = scene()
out = record(dry)
file_out(out)
```